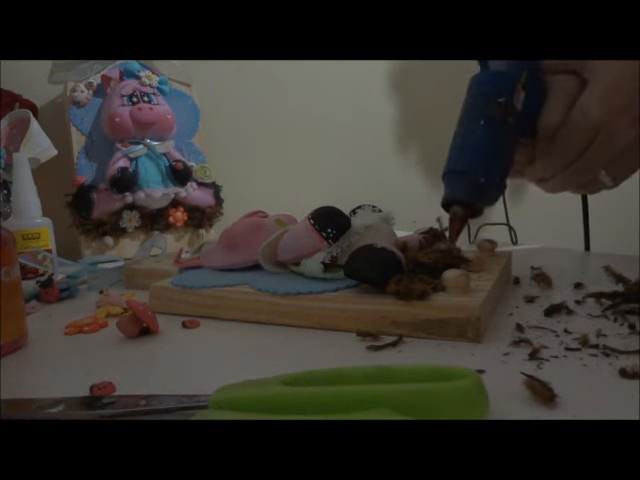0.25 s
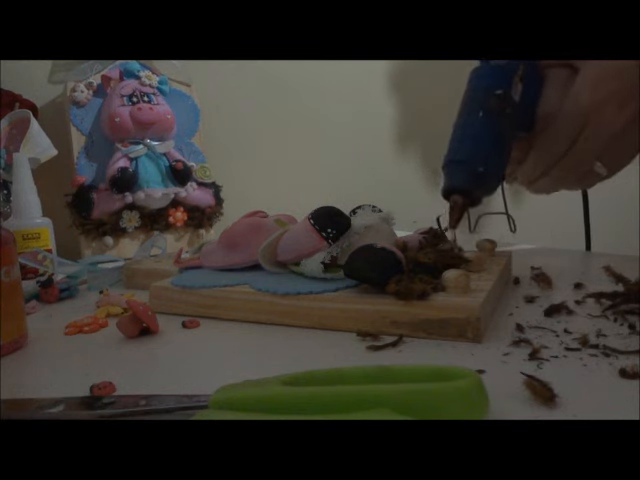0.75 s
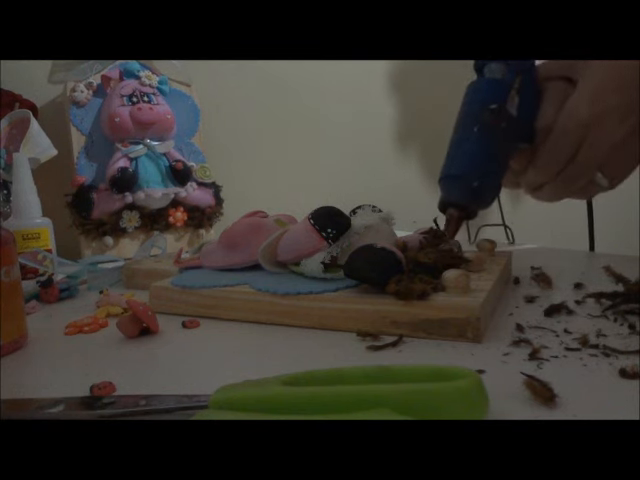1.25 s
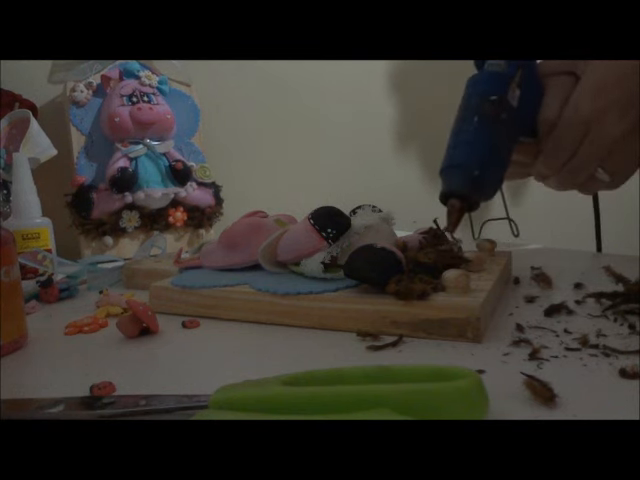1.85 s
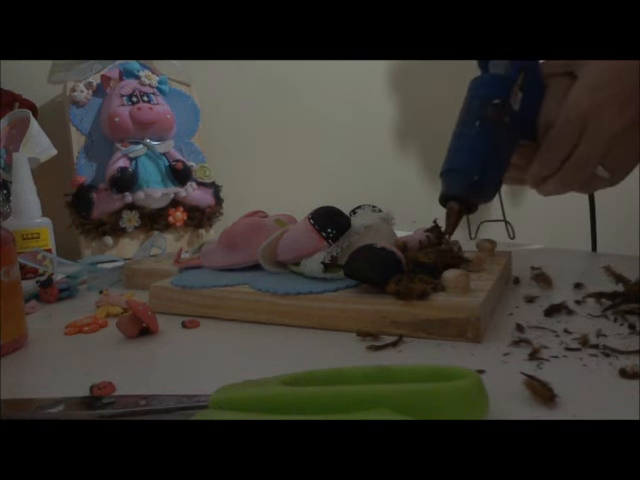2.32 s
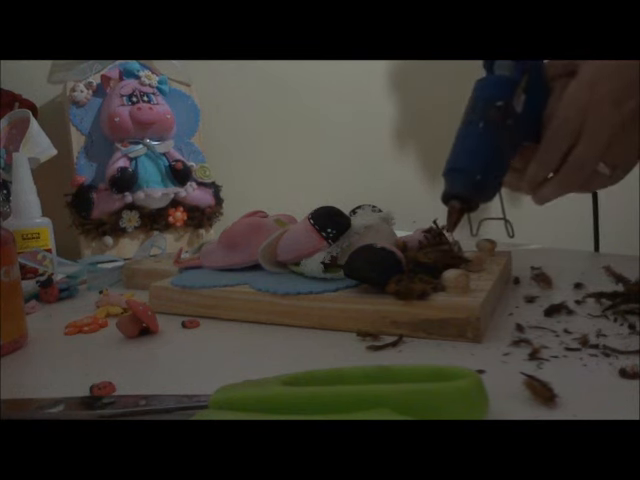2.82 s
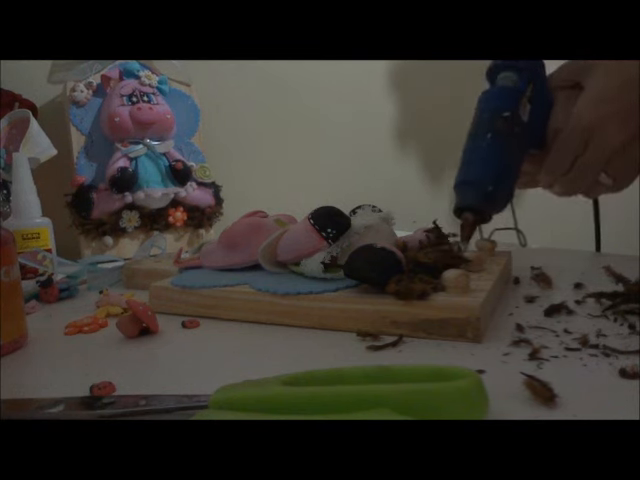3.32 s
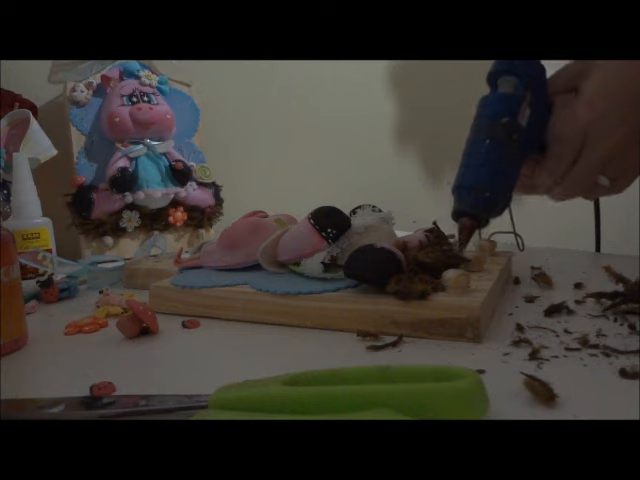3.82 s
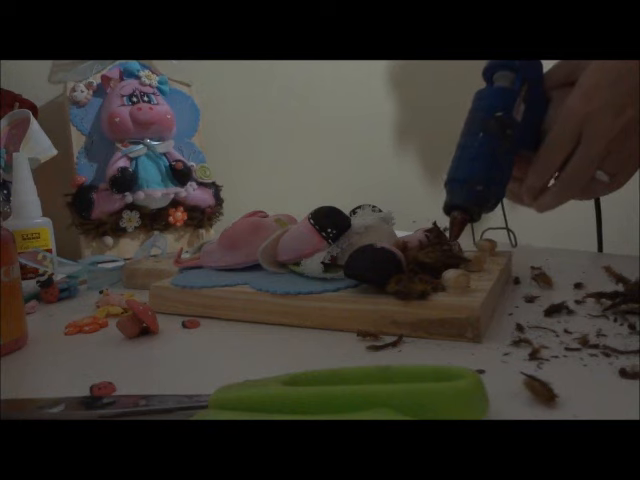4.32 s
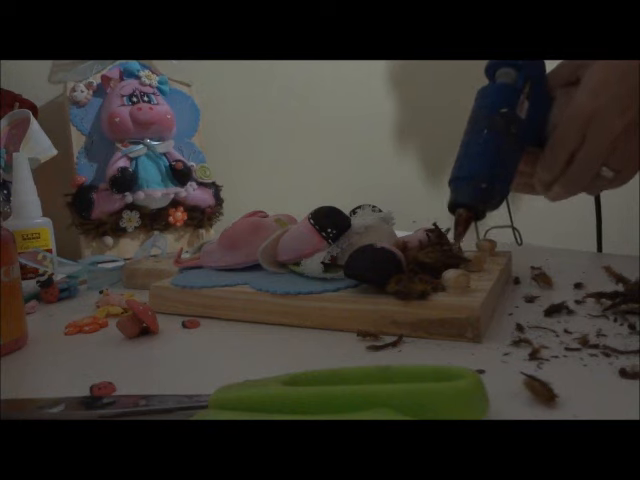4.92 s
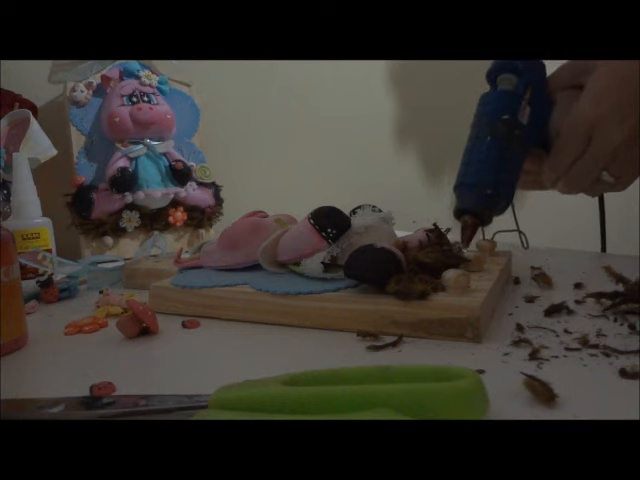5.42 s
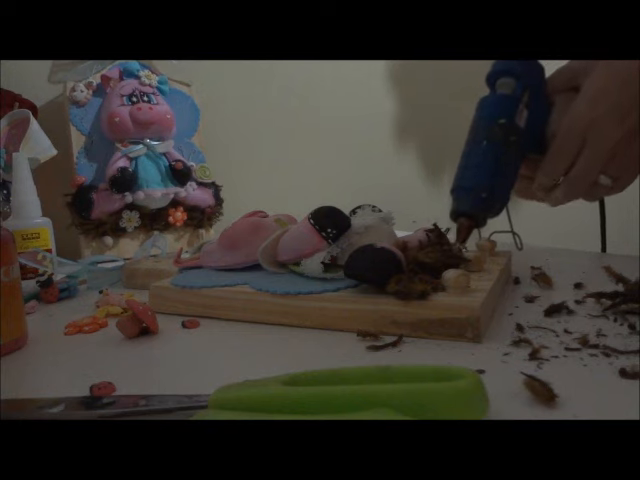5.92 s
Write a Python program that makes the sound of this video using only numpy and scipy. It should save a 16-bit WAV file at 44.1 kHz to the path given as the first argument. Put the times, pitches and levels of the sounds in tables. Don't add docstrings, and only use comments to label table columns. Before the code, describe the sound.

A glue gun trigger is pumped over and over, plastic clicks running into ratcheting creaks that end in sharp snaps and chattering returns.

```python
import sys
import numpy as np
from scipy import signal
from scipy.fft import rfft, irfft
from scipy.io import wavfile
from scipy.ndimage import uniform_filter1d, minimum_filter1d

SR = 44100
rng = np.random.default_rng(int(sys.argv[2]) if len(sys.argv) > 2 else 0)


def amp(db):
    return 10 ** (np.asarray(db, float) / 20)


def write(x):
    x = np.atleast_2d(x).T
    wavfile.write(sys.argv[1], SR, np.round(np.clip(x, -1, 1) * 32767).astype(np.int16))


N = 271950

# pitch_hz, width_hz (wider dies faster), level_db
BARREL_MODES = [(1999, 69, 1.5), (2135, 83, -0.5), (1482, 80, -1), (1867, 56, -7), (2398, 70, -2.5),
                (2703, 44, -7.5), (2910, 170, -13.5), (3390, 18, -13)]


def evened(x):
    return x / np.sqrt(np.mean(x ** 2) + 1e-20)


def read(points, hz):
    f, value = np.transpose(points)
    return np.interp(np.log(hz + 1), np.log(f + 1), value)


def along(rows):
    s, *columns = np.transpose(rows)
    return [np.interp(np.arange(N) / SR, s, column) for column in columns]


def ring(x, hz, width):
    shrink = np.exp(-np.pi * width / SR)
    turn = 2 * np.pi * hz / SR
    return signal.lfilter([0, np.sin(turn)], [1, -2 * shrink * np.cos(turn), shrink * shrink], x)


def colour(x, spectrum):
    level_db = np.maximum(read(spectrum, abs(np.fft.fftfreq(4096, 1 / SR))), -100)
    log_gain = np.log(amp(level_db))
    taps = np.fft.ifft(np.exp(np.conj(signal.hilbert(log_gain)))).real[:2048]
    return signal.oaconvolve(x, taps / np.linalg.norm(taps))[:N]


def bursts(rows, spread_db, last_s, ragged):
    s, db = np.transpose(rows)
    t = np.arange(200)
    chance = rng.standard_normal((len(s), len(t) + 1))
    force = (t == 0) + ragged * chance[:, 1:] * np.exp(-t / (last_s * SR))
    force /= np.linalg.norm(force, axis=1, keepdims=True)
    force *= amp(db + spread_db * chance[:, 0])[:, None]
    out = np.zeros(N + len(t))
    np.add.at(out, np.round(s * SR).astype(int)[:, None] + t, force)
    return out[:N]


def grit(size_db):
    size = np.minimum(rng.exponential(1, N), 5)
    return evened(rng.standard_normal(N) * amp(size_db * size))


def highpass(x, order, hz):
    return signal.sosfilt(signal.butter(order, hz, "high", fs=SR, output="sos"), x)


def feed(slips, grip):
    # pitch_hz, width_hz, level_db
    handle_modes = [(686, 30.5, -6), (744, 39, -8.5), (926, 74, -14), (1286, 48, -7), (1562, 115, -13),
                    (452, 72, -13.5)]
    # pitch_hz, level_db (per Hz)
    tick_tone = [(300, -80), (2600, -43.5), (3700, -14), (4960, 4.5), (6390, -2), (7630, -1), (9960, -8),
                 (12000, -25), (15600, -45.5)]
    # pitch_hz, level_db (per Hz)
    air_tone = [(9000, -57), (11500, 5.5), (14000, 6.5), (15500, 0), (16300, -45)]
    handle_db, sharp_db, air_db = along(grip)

    fade = np.exp(-np.arange(3000) / (0.0061 * SR))
    power = signal.oaconvolve(bursts(slips, 0, .001, 0) ** 2, fade)[:N]
    pressure = np.sqrt(power.clip(0))
    rub = pressure * amp(0.55 * handle_db) * grit(6.1)

    scrape = sum(amp(db) * ring(amp(-28.5) * rub, hz, width + 250) for hz, width, db in BARREL_MODES)
    handle = 0
    for hz, width, db in handle_modes:
        push = bursts(slips, 4.0, 0.00043, 0.28) + amp(-32.0) * rub
        handle += amp(db) * ring(amp(handle_db) * push, hz, width)

    hard = np.multiply(slips, [1, 1.2])
    click = bursts(hard, 1.0, .0009, .45)
    tick = colour(amp(sharp_db) * (click + amp(-27.5) * rub), tick_tone)
    tick += amp(-23.0) * ring(amp(sharp_db) * click, 5294, 108)
    thin_click = bursts(hard, 1.2, 0.0012, 0.77)
    air = colour(amp(air_db) * (thin_click + amp(-20) * rub), air_tone)

    shell = amp(1.0) * barrel(slips, grip, free_s=0.0047, grip_db=-21.0) + scrape + amp(2.5) * handle
    for _ in range(4):
        shell = highpass(shell, 2, 560)
    return shell + amp(18.5) * tick + amp(11.5) * air


def barrel(slips, grip, free_s, grip_db):
    s, db = np.transpose(slips)
    hz, width, mode_db = np.transpose(BARREL_MODES)
    t = np.arange(700) / SR
    chance = rng.standard_normal((len(s), 3, len(hz), 1))
    pitch = hz[:, None] * (1 + .025 * chance[:, 0])
    wave = np.sin(2 * np.pi * pitch * t + .35 * chance[:, 1])

    hold_db = np.interp(s, *np.transpose(grip)[:2])[:, None, None] + 9
    side_db = 0.72 * hold_db * (mode_db < 0)[:, None]
    level = amp(mode_db[:, None] + side_db + 2.0 * chance[:, 2])
    tone = (level * np.exp(-np.pi * width[:, None] * t) * wave).sum(axis=1)

    rise = 1 - np.exp(-t / .0004)
    damped = amp(grip_db / (1 + np.exp((free_s - t) / 0.00071)))
    tone *= damped * rise * signal.windows.tukey(2 * len(t), .5)[len(t):]
    tone *= amp(db)[:, None] / abs(tone).max(axis=1, keepdims=True)
    out = np.zeros(N + len(t))
    np.add.at(out, np.round(s * SR).astype(int)[:, None] + np.arange(len(t)), tone)
    return out[:N]


def strokes():
    # time_s, slips so far (the first pull is already under way)
    travels = [
        [(.004, 10), (.0146, 11), (.0905, 17), (.1431, 20), (.1698, 22), (.2251, 25), (.2351, 26)],
        [(.7658, 0), (.9748, 16), (1.0145, 20), (1.051, 23), (1.1104, 27), (1.1326, 29)],
        [(1.5682, 0), (1.6046, 4), (1.6914, 12), (1.7305, 15), (1.8399, 25)],
        [(2.2636, 0), (2.3103, 5), (2.3895, 12), (2.4735, 18), (2.5685, 26), (2.6242, 31)],
        [(3.0121, 0), (3.0389, 3), (3.0921, 7), (3.1285, 11), (3.2098, 18), (3.2768, 25), (3.2919, 26)],
        [(3.699, 0), (3.7281, 3), (3.7874, 8), (3.8423, 14), (3.9053, 19), (3.9397, 23), (4.0316, 29),
         (4.0572, 31)],
        [(4.4651, 0), (4.5091, 4), (4.5751, 8), (4.6205, 11), (4.733, 17), (4.7625, 19), (4.8396, 25)],
        [(5.2447, 0), (5.2829, 4), (5.3548, 10), (5.4317, 16), (5.5326, 25)],
        [(5.9648, 0), (5.99, 3), (6.0283, 6), (6.0831, 12), (6.1147, 15), (6.1536, 18)],
    ]
    # full_db, slips to build up, end_easing_db, handle_hold_db, dryness_db
    pulls = [(-10, 3.1, -13.5, 1.5, 12), (-8.5, 2.07, -38, 2, 13), (-7, 5.6, -7.5, 2, 4),
             (-5, 5.5, -55, -2, 8.5), (-6, 6.2, -11.5, 0.5, 2), (-4.5, 7.36, -48, -0.5, 8),
             (-4, 5.2, -8.5, -0.5, 6), (-6, 4.4, -8, -0.5, 1), (-8.5, 3.5, 8, -1, 0)]
    bites = [0, 1.5, 4.5, 6.5, 4.5, 6.5, 3.5, 5.5, 4.5]
    # growth_db over the travel, sharpness_db
    efforts = [(2, 0), (4.5, 1), (4.5, -2), (-1.5, -1), (-2, -1), (-6, 0), (-1, 0), (-1.5, -0.5),
               (-2.5, -1)]
    # start_s, level_db, die_away_s, gap_s between slips, dryness_db
    releases = [(.4713, -9, 0.15, 0.012, 8.5), (1.3255, -11, 0.15, 0.01, 4), (2.0353, -12, 0.13, 0.0076, 4),
                (2.7686, -12, 0.12, .0086, 5), (3.453, -11.5, 0.13, 0.0079, 4), (4.2105, -10, .15, .011, 6),
                (5.0083, -9.5, 0.11, 0.0099, 3), (5.6988, -10, 0.14, 0.011, 2.5)]
    release_holds = [1, -1, 3, 0, 0, 2, 1.5, 0]
    # start_s, level_db
    stray = [(.7266, -38)]
    # time_s, extra_db
    jolts = [(.004, 2), (.015, 4), (0.107, 6), (.807, 2.5), (.831, -3.5), (0.958, 2), (1.73, 2.5),
             (2.346, -3), (2.417, 6.5), (2.481, 0), (2.495, 1.5), (3.067, 4), (3.053, -15), (3.15, 4),
             (3.8, 2.5), (3.91, 0.5), (4.032, 5), (2.605, 5), (4.583, 2), (4.62, 0), (4.77, 1), (5.319, 0),
             (5.344, -6), (5.393, 3), (5.432, 1.5), (6.037, 2.5)]
    jolt_s = .009

    parts = [pull(travel, bite, *effort, *row)
             for travel, bite, effort, row in zip(travels, bites, efforts, pulls)]
    parts += [release(hold, *row) for hold, row in zip(release_holds, releases)]
    s, db = np.vstack([slips for slips, _ in parts] + [stray]).T
    db = db + sum(extra_db * np.exp(-((s - at) / jolt_s) ** 4) for at, extra_db in jolts)
    return np.c_[s, db], sorted(tuple(row) for _, grip in parts for row in grip)


def pull(travel, bite, grow_db, sharp_db, full_db, build, ease_db, hold_db, dry_db):
    # share of travel (0 to 1), handle_db, sharpness_db, dryness_db
    pull_grip = [(0, -6, -2.5, -35), (.15, -21.5, -12, -43), (.4, -17.5, -10.5, -34),
                 (.8, -10.5, -9.5, -30), (.99, -7, -3.5, -28)]
    first_db, ease_slips = -27.5, 1.02
    jitter_s, spread_db = .0004, 1.5
    long_stick_s, creep_s, creep_db = .0145, .0075, -13
    loose_db, loose_dull_db = -3.5, -15

    s, steps = np.transpose(travel)
    n = np.arange(steps[0], steps[-1] + 1)
    chance = rng.standard_normal((len(n), 3))
    even = np.interp(n, steps, s)
    loose = n < bite
    at = even + jitter_s * chance[:, 0]
    db = full_db + first_db * np.exp(-n / build) + loose_db * loose
    db += grow_db * (n / n[-1] - .5) + ease_db * np.exp((n - n[-1]) / ease_slips)

    long_stick = np.append(np.diff(even) > long_stick_s, False)
    creep_level = db + creep_db + spread_db * chance[:, 2] - 60 * ~long_stick
    creep = np.c_[at + creep_s, creep_level]

    share, *columns = np.transpose(pull_grip)
    handle, sharp, dryness = (np.interp(n / n[-1], share, column) for column in columns)
    dull = loose_dull_db * loose
    grip = np.c_[even, handle + hold_db, sharp + sharp_db + dull, dryness + dry_db + dull]
    return np.r_[np.c_[at, db + spread_db * chance[:, 1]], creep], grip.tolist()


def release(hold_db, start, strength_db, die_s, gap_s, dry_db, count=18):
    # time_s after its start, handle_db, sharpness_db, dryness_db
    release_grip = [(-.03, 5, -12.5, -47), (.02, -3, 0.5, -15.5), (.1, -10, -7.5, -19), (.2, -12, -31, -35)]
    front_db, front_s = -4.5, 0.011
    fade_db, fade_bend = -28.5, 1.93
    jitter, spread_db = .2, 1

    chance = rng.standard_normal((count, 2))
    n = np.arange(count)
    t = gap_s * (n + jitter * chance[:, 0] * (n > 0))
    db = strength_db + front_db * np.exp(-t / front_s) + fade_db * (abs(t) / die_s) ** fade_bend
    grip = [(start + s, handle + hold_db, sharp, dryness + dry_db)
            for s, handle, sharp, dryness in release_grip]
    return np.c_[start + t, db + spread_db * chance[:, 1]], grip


def spring():
    # start_s, level_db
    snaps = [(0.2538, 2.5), (0.3051, 2.5), (0.3538, 4), (0.3681, -5), (1.1466, 4), (1.1907, -0.5),
             (1.2541, 0.5), (1.8791, 3.5), (1.9455, 1.5), (2.6541, 3), (3.3172, 4.5), (3.3767, 4),
             (4.0681, 4), (4.116, 0.5), (4.8784, 4.5), (4.9456, 3), (5.5645, 5), (5.6334, 3.5)]
    # pitch_hz, level_db (per Hz)
    snap_tone = [(40, -24), (300, -28.5), (500, -16.5), (750, -4), (1400, 6.5), (2110, 0.5), (3300, 2.5),
                 (4450, -2), (5400, 1.5), (7760, -4), (10900, -9), (16000, -23)]
    lag_s, settle_s = 0.00092, .0014
    crack = amp(8) * bursts(np.add(snaps, [lag_s, 0]), 0, .0002, .04)
    fade = signal.windows.exponential(900, 20, settle_s * SR, False)
    settle = signal.oaconvolve(abs(crack), fade)[:N] * grit(4.4)
    return amp(-4.0) * colour(crack, snap_tone), amp(-21.5) * colour(settle, snap_tone)


def low_scrape():
    # time_s, level_db
    swell = [
        (6.08, -83),
        (6.11, -45),
        (6.166, -35.5),
    ]
    # pitch_hz, width_hz, level_db
    scrape_modes = [(107.8, 44, -1), (199, 38, -7), (330, 41, 15.5), (383, 65, -9), (450, 34, 16.5)]
    t = np.arange(N) / SR
    push = amp(along(swell)[0]) * (t > swell[0][0])
    low_tones = sum(amp(db) * ring(grit(9.6), hz, width) for hz, width, db in scrape_modes)
    return amp(8.5) * push * evened(highpass(low_tones, 4, 85))


def room(x):
    turn = 2 * np.pi * 4.3 * np.arange(N) / SR
    wet = 0
    for k in range(3):
        share = np.sqrt(2 / 3) * np.cos(turn + k * 2 * np.pi / 3)
        wet = wet + signal.fftconvolve((x * share)[None], echoes(), axes=1)[:, :N]
    return wet


def echoes():
    # pitch_hz, die_away_s
    die_away = [(300, 0.19), (1000, 0.029), (3000, 0.11), (8000, 0.084), (15000, 0.033)]
    taps = np.zeros((3, SR // 2))
    jitter = rng.integers(0, 12, (3, (SR // 2 - 251) // 12))
    at = np.arange(250, SR // 2 - 12, 12) + jitter
    np.put_along_axis(taps, at, rng.choice([-1., 1.], at.shape), 1)
    hz, t, z = signal.stft(taps[0] + 0.79 * taps[1:], SR, nperseg=128)
    decay = amp(-60 * t / read(die_away, hz)[:, None])
    decay = decay + amp(-15.5 - 60 * t / 0.26)
    tail = signal.istft(z * decay, SR, nperseg=128)[1]
    return tail / np.linalg.norm(tail[0])


def floor():
    # pitch_hz, level_db (per Hz)
    floor_tone = [(20, -12), (60, -17), (130, -9.5), (300, -6.5), (650, 3.5), (1100, 4), (2000, -3.5),
                  (4500, -12.5), (11600, -17.5), (15200, -18), (16500, -41)]
    # pitch_hz, likeness (1 same, 0 unrelated, -1 opposite)
    likeness = [(60, 1), (240, 0.0041), (950, -0.94), (3770, -0.065), (15000, 1)]
    frames, hz = N // 256 + 5, np.fft.rfftfreq(1024, 1 / SR)
    a, b, c, d = rng.standard_normal((frames, 513, 4)).T
    same = np.clip(read(likeness, hz), -1, 1)[:, None]
    left = a + 1j * b
    right = same * left + np.sqrt(1 - same ** 2) * (c + 1j * d)
    z = np.array([left, right]) * amp(read(floor_tone, hz))[:, None]
    noise = signal.istft(z, nperseg=1024, noverlap=768)[1][:, :N]
    return amp(-51.5) * evened(noise)


def scene():
    # pitch_hz, left_minus_right_db
    balance = [(60, -1), (180, 0.5), (550, 1), (1650, -4), (4970, -0.5), (15000, -1.5)]
    slips, grip = strokes()
    creep = feed(slips, grip)
    crack, settle = spring()
    wet = room(amp(-11) * creep + amp(-5) * crack)
    heard = creep + crack + settle + wet
    lean = read(balance, np.fft.rfftfreq(N, 1 / SR)) / 2
    placed = irfft(rfft(heard) * amp(np.array([lean, -lean])), N)
    return placed + low_scrape() + floor()


def top_cut(x):
    return signal.sosfilt(signal.butter(12, 16990, fs=SR, output="sos"), x)


def record(dry):
    ceiling = .93
    peak = -minimum_filter1d(-abs(dry).max(0), size=91)
    over = np.maximum(peak, ceiling)
    held = dry * ceiling / uniform_filter1d(over, size=45)
    cut = signal.firwin(255, 16200, window=("kaiser", 8), fs=SR)
    return top_cut(signal.oaconvolve(held, cut[None], "same"))


dry = scene()
out = record(dry)
write(out)
```